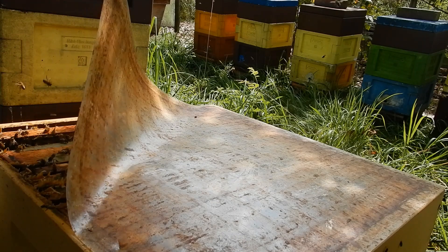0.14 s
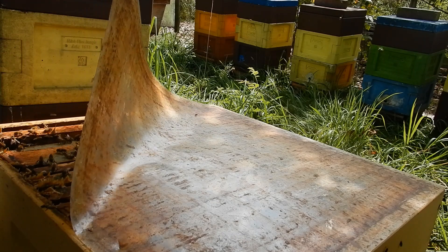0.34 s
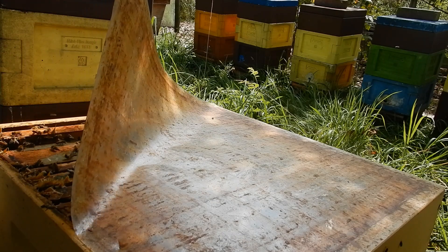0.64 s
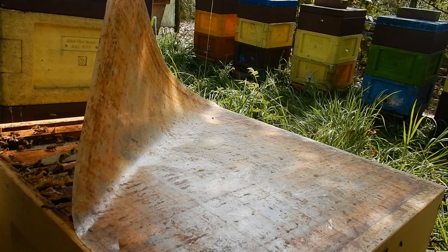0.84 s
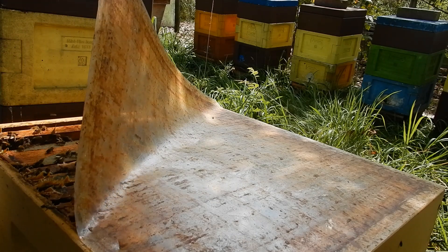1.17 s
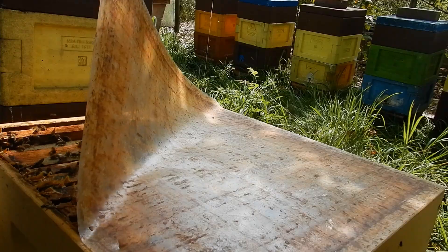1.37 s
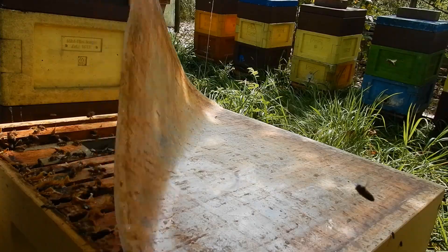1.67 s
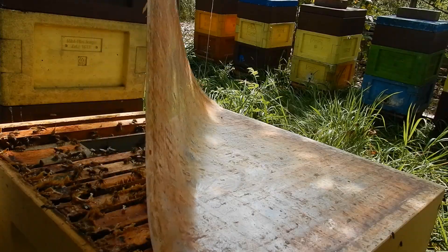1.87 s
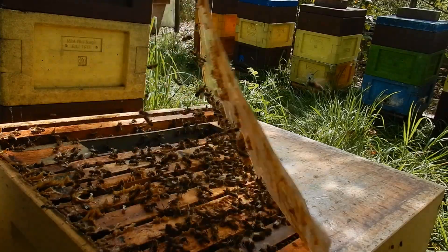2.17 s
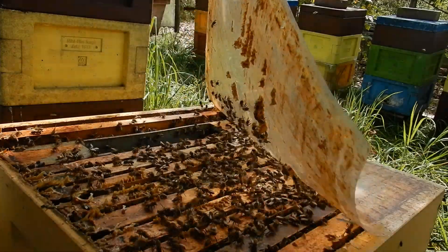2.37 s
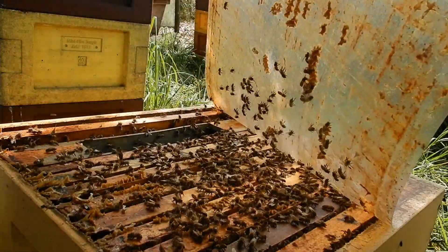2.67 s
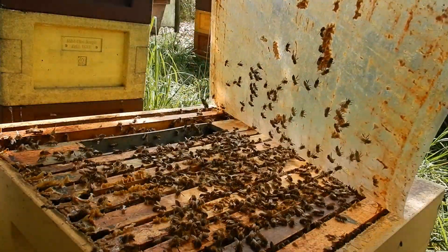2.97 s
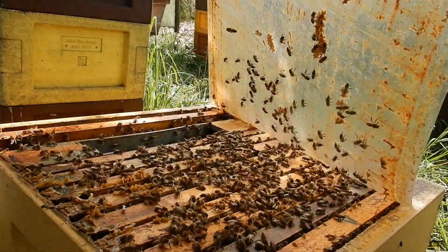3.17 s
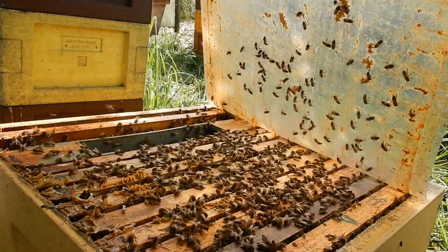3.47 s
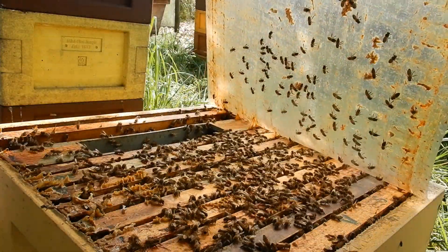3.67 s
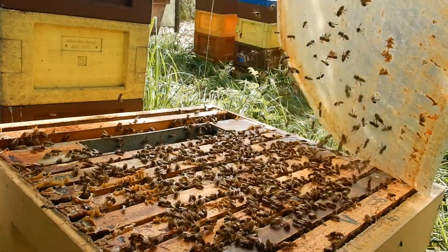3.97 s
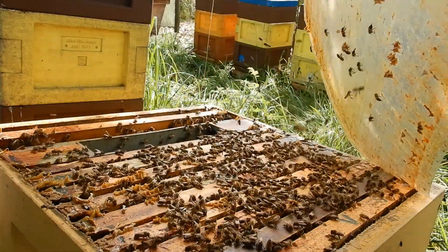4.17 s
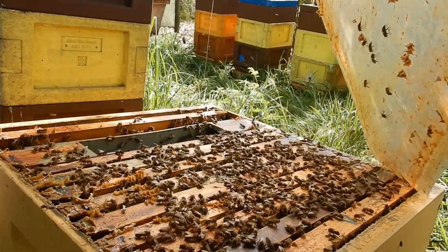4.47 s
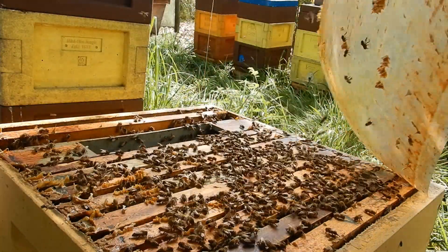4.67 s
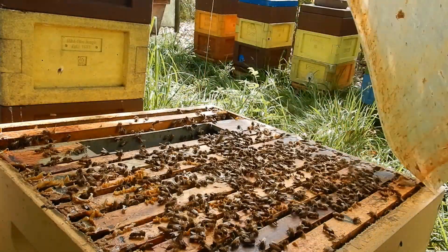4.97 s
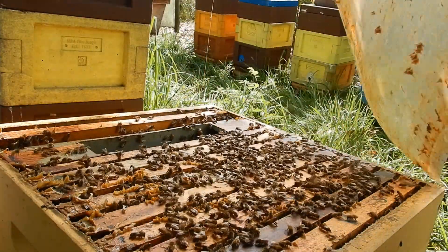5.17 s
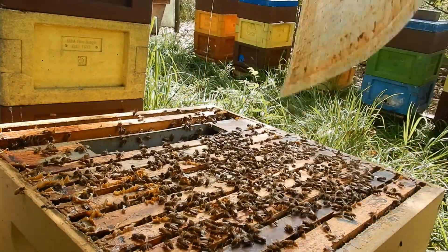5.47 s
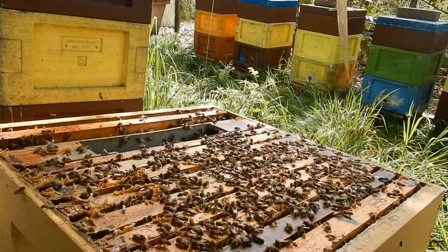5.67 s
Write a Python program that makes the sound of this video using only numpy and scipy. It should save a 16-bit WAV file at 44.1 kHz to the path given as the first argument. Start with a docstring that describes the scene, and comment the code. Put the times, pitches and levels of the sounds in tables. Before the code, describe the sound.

Outdoors, very close stereo microphones beside an open beehive. A stiff plastic cover stuck with propolis pops loose: a few isolated snaps first, a pause with soft bee hum, then crackling bursts with hollow hive thumps and floppy bends. The densest crackle comes around four seconds. Afterwards the freed sheet wobbles, ticks twice and scuffs the rim, leaving a faint hum.

```python
"""Snaps lead: a stiff plastic cover sheet is peeled off the frames of an open beehive, outdoors and close by.
Spots of sticky propolis let go in runs; each pops, cracks, and sets the sheet and the hive box ringing.
Finer threads tear in between, slack folds flop over, hard tugs jolt the hive with a thud and a boom.
The sheet wobbles as it is folded back, and again when it swings free and scuffs the rim.
Underneath, bees hum in wavering harmonics and rustle as coloured noise with a faint hiss; their level rises and dips."""
import sys
import numpy as np
from scipy import signal
from scipy.fft import rfft, irfft
from scipy.io import wavfile

SR = 44100
rng = np.random.default_rng(int(sys.argv[2]) if len(sys.argv) > 2 else 0)


def wrap_up_sound(samples):
    """Save the sound to the file named by the first command line argument, as 16-bit audio."""
    columns = np.atleast_2d(samples).T
    # keep every value between -1 and 1, then stretch to whole-number steps
    tamed = np.clip(columns, -1, 1)
    steps = np.round(tamed * 32767).astype(np.int16)
    wavfile.write(sys.argv[1], SR, steps)


N = 257266
TIME = np.arange(N) / SR

# Colour of a cracking bond. Each row: frequency in Hz, level in dB per Hz.
CRACK_COLOUR = [(900, -24), (2200, -12), (2900, -3.5), (3800, -6.5), (4900, 1), (6200, -10), (8000, -22),
                (12000, -33.5), (16000, -44.5)]
# Colour of the ringing sheet. Each row: frequency in Hz, level in dB per Hz.
SHEET_COLOUR = [(150, -23), (550, -8), (850, -3.5), (1200, -1), (1700, -1.5), (2600, -6.5), (3500, -10.5),
                (6000, -31), (12000, -58.5)]
# Colour of a push on the hive. Each row: frequency in Hz, level in dB per Hz.
THUD_COLOUR = [(20, -4.5), (60, 2), (130, 2.5), (400, 0), (750, -1.5), (1500, -24.5), (3000, -51.5)]
# Colour of the bending sheet. Each row: frequency in Hz, level in dB per Hz.
FLEX_COLOUR = [(40, -32), (120, -11.5), (210, 0.5), (380, 0), (750, -4.5), (1300, -13), (1900, -27.5),
               (3500, -50.5), (8000, -59)]
# The peeling edge as it travels across the hive. Each row: time in seconds, left minus right treble in dB,
# length of a pop in cycles, tuning of the box modes as a factor (high for a short taut span, low for a slack one).
PEEL_EDGE = [(.36, 3, 0.67, .8), (.46, 4, 0.96, 0.77), (.59, 3, 1.3, .88), (.635, 2, 0.54, 0.92),
             (1.75, 2, 0.53, 1.11), (2.2, 0, 0.54, 1.1), (3.35, -1, 0.76, 1.067), (3.73, -1, 0.61, 1.5),
             (3.85, -2, 0.3, 1.47), (4.18, 0, 0.48, 1.5), (4.55, -4, 1.7, 1.6)]
# Level of the background, which rises and dips. Each row: time in seconds, rustle in dB, hum in dB.
BACKGROUND_LEVEL = [(0, -57, -54), (.22, -62, -71), (.55, -55.5, -59), (.8, -63, -66), (1.6, -52.5, -52.5),
                    (2.1, -60.5, -63.5), (2.9, -51.5, -60), (3.05, -55, -65), (3.3, -54.5, -51.5),
                    (3.7, -60.5, -70), (4.14, -66.5, -63.5), (4.28, -72.5, -73.5), (4.85, -71, -75),
                    (5.2, -75.5, -71), (5.6, -70, -64), (5.82, -62.5, -69.5)]


def peeling(thread_db=-26, thread_s=0.003, sizzle_db=-7, push_db=-32):
    """Every snap is a crack and a pop; their joint energy pushes the hive and rings sheet and box."""
    # The bonds that break. Each row: time in seconds, pop level in dB before its colour, pop pitch in Hz,
    # crack level in dB, crack pitch in Hz, crack decay in seconds; levels as if all the energy fell in 1 ms.
    snaps = [(0.0523, -34.5, 1720, -49, 4600, 0.0017), (0.0751, -14.5, 1510, -17.5, 5600, 0.00056),
             (0.0776, -8.5, 1232, -18, 4750.0, 0.00053), (0.3637, -26.5, 1250, -34.5, 5560, 0.00058),
             (0.3861, -24.0, 2010, -37.5, 5350, 0.0005), (0.3985, -36, 1890, -55, 4900.0, 0.0016),
             (0.4166, -34.5, 1900, -58.0, 5050.0, 0.002), (0.4441, -31.0, 1520.0, -41, 5250.0, 0.0014),
             (0.4534, -11, 1180, -36.5, 4960, 0.001), (0.4738, -9.5, 1430, -28.5, 5530, 0.00047),
             (0.477, -11.5, 2170, -35.5, 4460, 0.0015), (0.5884, -29, 2310, -50.0, 4450.0, 0.0022),
             (0.6372, -2, 1405, -23.5, 5200.0, 0.00069), (1.057, -18.5, 1790, -28, 5000.0, 0.00025),
             (1.402, -40.5, 2880, -31, 4940, 0.00027), (1.7303, -15.5, 1350, -10.5, 4860, 0.00028),
             (1.743, -21.5, 1180.0, -33, 4800.0, 0.0008), (1.7481, -27, 1420.0, -28.0, 4900, 0.00045),
             (1.7638, -20, 1280, -23.5, 4850, 0.00055), (1.779, -22.5, 1390, -33, 4800, 0.0005),
             (1.7947, -25.0, 1560, -19, 4530, 0.0011), (1.8046, -21, 880.0, -37.5, 4570, 0.0004),
             (1.8136, -28.0, 1280.0, -38, 4750.0, 0.002), (1.8382, -30, 1550, -15, 5020, 0.0011),
             (1.8416, -16, 1330, -16.5, 4500, 0.00068), (1.905, -51, 1820, -28, 4850.0, 0.0015),
             (2.0811, -70, 3430.0, -37, 5100, 0.0013), (2.1525, -13, 1460, -13, 5060, 0.00017),
             (2.1746, -21, 1550, -20.5, 4740, 0.00096), (2.1845, -30.5, 1990.0, -23.5, 4900.0, 0.00014),
             (2.198, -41.5, 2000.0, -30.5, 5040, 0.0005), (2.2395, -21.5, 3140, -11.0, 5240, 0.00089),
             (2.348, -22, 1700, -17.5, 4600.0, 0.00035), (2.3753, -20.5, 2580, -25, 4500.0, 0.0021),
             (2.4167, -29.5, 1490, -31.5, 4400, 0.0017), (2.4473, -26.5, 1410.0, -26, 4880, 0.00046),
             (2.4838, -23, 1270, -42, 5100, 0.0013), (2.5045, -20, 1300, -36.5, 5040, 0.00082),
             (2.567, -45, 1410, -44.5, 4950, 0.00064), (2.9713, -20.5, 2240, -16, 4730, 0.00034),
             (3.0055, -22, 1950, -19.5, 4500, 0.00016), (3.1076, -41, 1990.0, -35.5, 4800, 0.00027),
             (3.1214, -17.5, 1360, -23, 4700, 0.00058), (3.13, -23.5, 1450.0, -30.5, 4600.0, 0.0013),
             (3.2038, -16, 1600, -14.5, 4520, 0.0014), (3.3338, -15, 1590, -21.5, 4330, 0.00046),
             (3.3633, -32, 1180.0, -39, 5150, 0.0013), (3.4474, -41.5, 2630, -31, 5000, 0.00059),
             (3.4867, -39, 1720.0, -21.0, 4760, 0.00023), (3.5252, -36, 2430.0, -22, 4880, 0.00027),
             (3.539, -15.5, 1750, -20.5, 4600, 0.0014), (3.5841, -14.5, 1810, -21.5, 4300.0, 0.00086),
             (3.587, -7.5, 2450, -15.5, 5100, 0.00044), (3.6016, -12, 2480.0, -16, 4650, 0.0011),
             (3.6098, -21.0, 2520.0, -29, 4460, 0.001), (3.7307, -12.0, 2840, -27.5, 5600.0, 0.0004),
             (3.8271, -41, 1940.0, -37.5, 4900.0, 0.00057), (3.8532, -13.5, 1850.0, -26.5, 4500.0, 0.0004),
             (3.861, -29, 2110.0, -25.5, 5100, 0.0007), (3.88, -24.5, 2750.0, -32.5, 4330, 0.00055),
             (3.8938, -13, 1590, -18, 4530, 0.0008), (3.9223, -15.5, 2590.0, -19.5, 4720, 0.00028),
             (3.933, -16.5, 2740, -14.5, 4700, 0.00028), (3.949, -12.5, 2350, -23.5, 4600.0, 0.0005),
             (3.9569, -13, 1820, -16.0, 4860, 0.00018), (3.963, -33.5, 2430.0, -30.5, 4350.0, 0.0022),
             (3.9714, -15.5, 2100, -21.0, 4400, 0.00083), (3.9738, -21, 1880, -23, 4400, 0.0008),
             (3.9872, -18, 2000, -14, 4600, 0.00021), (3.9978, -16, 2530.0, -19.5, 4300, 0.0007),
             (4.004, -32, 1930.0, -28, 4590, 0.00061), (4.0118, -26, 2110.0, -32, 4430, 0.00017),
             (4.022, -20, 2280, -26, 4350, 0.00073), (4.0341, -20, 1600.0, -16.5, 4750.0, 0.0004),
             (4.0452, -21.5, 1620, -20, 4700.0, 0.0004), (4.057, -32, 2130, -24, 4600, 0.0003),
             (4.0603, -32, 1880, -30, 4600, 0.00034), (4.0912, -39, 2180, -32.5, 4650.0, 0.00035),
             (4.159, -53, 2125, -44, 4800.0, 0.00036), (4.1809, -44, 2443, -27, 4580, 0.0003),
             (4.5745, -13, 4580, -18.5, 4860, 0.00044), (4.7424, -31.5, 1974, -34.5, 4870, 0.0014),
             (4.7509, -31, 1610, -34.5, 4300, 0.00093), (4.892, -63, 2730, -42, 5440, 0.0006),
             (4.9627, -33, 1620, -27.5, 4850.0, 0.00025), (5.0432, -14, 4710, -18, 4840, 0.00028),
             (5.496, -30.5, 1710.0, -42.5, 4460, 0.0017)]
    # Colour of the pops. Each row: frequency in Hz, gain in dB.
    pop_colour = [(300, -30), (760, -24.5), (1020, 0), (5000, -2.5), (7000, -11.5), (14000, -30.5)]
    # How much of a snap passes on: most while the edge crosses the loose frames, little on the rim.
    # Each row: time in seconds, to the sheet in dB, to the box in dB.
    coupling = [(.08, -6.5, -16.5), (.45, -8.5, -24), (.64, -18.5, -30), (1.1, -14, -18.5),
                (1.75, -5.5, -9), (2.5, -1.5, -9), (3, -2, -28.5), (3.2, 1.5, -8.5), (3.52, -1, -12),
                (3.55, -13.5, -30), (3.75, -14, -49.5), (4, -9, -22), (4.57, -19, -45.5), (5, -10, -20.5)]
    # The sheet recoils with a short dull knock at each snap, strongest near 3.5 s, weaker before and after.
    # Each row: time in seconds, level relative to the snap in dB.
    recoil = [(1.1, -33), (2.9, -15), (3.55, -10.5), (3.7, -30), (4.05, -21)]

    cracks, pops, rings, thuds, booms, threads, knocks = np.zeros((7, 2, N))
    recoil_db = curve(recoil)[0]
    _, cycles, tuning = curve(PEEL_EDGE)
    to_sheet_db, to_box_db = curve(coupling)
    push = blow(np.ones((2, 1)))
    for s, pop_db, hz, crack_db, crack_hz, crack_s in snaps:
        now = round(s * SR)
        snap_db = 20 * np.log10(np.hypot(amp(pop_db), amp(crack_db)))
        ring_db = snap_db + to_sheet_db[now]

        fracture = struck(size=1024, decay_s=crack_s, late_db=-26, late_s=0.0036, rise_s=0.00033, side_db=-10)
        add(cracks, s - .0003, amp(crack_db) * snap_colour(fracture, crack_hz))
        add(pops, s - .0003, amp(pop_db) * pop(hz, cycles[now]))

        ring = struck(size=4096, decay_s=0.0026, late_db=-15.5, late_s=0.014, rise_s=0.00094, side_db=-22)
        add(rings, s + .0002, amp(ring_db) * blow(ring))
        # only a sharp crack excites the sheet's highest modes
        sizzle = struck(size=4096, decay_s=0.001, late_db=-18, late_s=0.012, rise_s=0.0012, side_db=-7.5)
        excited_db = min(ring_db, crack_db) + sizzle_db
        add(cracks, s + .0005, amp(excited_db) * snap_colour(sizzle, crack_hz))

        add(thuds, s, amp(snap_db + push_db) * push)
        add(knocks, s, amp(snap_db + recoil_db[now]) * push)
        add(booms, s + .0005, amp(snap_db + to_box_db[now]) * boom(tuning[now]))

        # two fine threads of propolis part just after the main bond
        for when, strength in rng.standard_normal((2, 2)):
            tick = struck(size=128, decay_s=.0003, late_db=-23, late_s=.001, rise_s=.0001, side_db=-7)
            tick_db = crack_db + thread_db + 3 * strength
            add(threads, s + thread_s * abs(when), amp(tick_db) * blow(tick))
    sheet = travel(tinted(rings, SHEET_COLOUR)) + tinted(knocks, FLEX_COLOUR)
    fine = tinted(threads + creak(), CRACK_COLOUR)
    hive = tinted(thuds, THUD_COLOUR) + booms
    return place(cracks + fine + colour(pops, pop_colour) + sheet + hive)


def pop(hz, cycles, glide=0.03, scatter_db=-12, scatter_s=0.0023, size=768):
    """A released patch of sheet flips: a few swings that glide in pitch, then scatter from the frames."""
    t = np.arange(size) / SR
    u = hz * t - 2 * cycles  # cycles from the height of the pop
    bell = np.exp(-(u / cycles) ** 2 / 2)
    swing = bell * np.sin(2 * np.pi * (u + glide * u ** 2 / cycles + rng.random()))
    swing *= 1 - np.exp(-(hz * t / .5) ** 2)  # starts from rest
    paths = pair(size, side_db=-19.5) * np.exp(-t / scatter_s) * (t > .001)
    scattered = irfft(rfft(paths) * rfft(swing))
    return blow(blow(swing) + amp(scatter_db) * blow(scattered))


def struck(size, decay_s, late_db, late_s, rise_s, side_db):
    """A burst of crowded vibration: a quick fall, then a weaker, longer tail."""
    t = np.arange(size) / SR
    fall = np.exp(-t / decay_s) + amp(late_db) * np.exp(-t / late_s)
    return pair(size, side_db) * (1 - np.exp(-t / rise_s)) * fall


def snap_colour(x, hz, size=1024):
    """Gives a burst the colour of a crack whose main resonance lies at hz."""
    top_hz = max(CRACK_COLOUR, key=lambda point: point[1])[0]
    shifted = [(f * hz / top_hz, db) for f, db in CRACK_COLOUR]
    return blow(colour(x, shifted, size=size))


def travel(x, lag_s=0.003532, fast_hz=3000):
    """Bending waves cross the sheet: the low ones arrive late (lag_s sets the travel time at 1 kHz)."""
    size = 2 * x.shape[1]
    hz = np.fft.rfftfreq(size, 1 / SR)
    # delay relative to the waves at fast_hz and above
    slowness = 1 / np.sqrt(np.clip(hz, 100, fast_hz)) - 1 / np.sqrt(fast_hz)
    late_s = lag_s * np.sqrt(1000) * slowness
    phase = 2 * np.pi * np.cumsum(late_s) * SR / size  # delay summed over frequency
    return irfft(rfft(x, size) * np.exp(-1j * phase))[:, :x.shape[1]]


def boom(tuning, spread=.05, rise_s=0.0046, t60_s=0.16, size=8192):
    """The low modes of sheet and box, a little retuned and differently weighted at each blow."""
    # Modes of the sheet over the box. Each row: frequency in Hz before tuning, mean level in dB.
    box_modes = [(108, -15.5), (140, -4.5), (162, -1), (195, -8), (238, -4.5), (290, 1), (335, -2.5),
                 (400, -5), (465, -9), (540, -8.5), (640, -16), (730, -9), (820, -12.5), (950, -13),
                 (1150, -12)]
    hz, db = np.transpose(box_modes)[:, :, None]
    detune, weight, phase = rng.standard_normal((3, len(box_modes), 1))
    t = np.arange(size) / SR
    fading = amp(db + 1.8 * weight - 60 * t / t60_s)
    modes = fading * np.sin(2 * np.pi * (hz * tuning * (1 + spread * detune) * t + phase))
    return blow(modes.sum(0) * (1 - np.exp(-t / rise_s)))[None]


def creak(slips_hz=130, unevenness=0.1):
    """The tightening sheet sticks and slips: an almost regular train of tiny ticks."""
    # Faint creaks as the sheet tightens. Each row: time in seconds, level in dB.
    creak_level = [(.25, -68), (.29, -58.5), (.42, -59), (.44, -74.5)]
    turns = np.cumsum(slips_hz * (1 + unevenness * drift(35))) / SR
    slips = np.diff(np.floor(turns), prepend=0)
    return level(creak_level) * slips * blow(np.ones(1))


def tearing(threads_per_s=700, spread_db=5, body_db=-3):
    """Threads tear in a crowd of tiny breaks of very unequal size, each a tick that stirs the sheet."""
    # Fast stretches of the peel, where fine threads tear between the snaps.
    # Each row: time of the height in seconds, level in dB, time to build in seconds, time to settle in seconds.
    tears = [(1.78, -46, 0.028, 0.06), (2.4, -52.5, 0.12, 0.19), (3.41, -51, .03, .05),
             (3.98, -49, 0.14, 0.037)]
    breaks = (rng.random(N) < threads_per_s / SR) * amp(spread_db * rng.standard_normal(N))
    grain = sum(swell(*row) for row in tears) * evened(breaks * pair(N, side_db=-4))
    return place(tinted(grain, CRACK_COLOUR) + amp(body_db) * tinted(grain, SHEET_COLOUR))


def flops():
    """A wide fold turns over: a slow, soft pop that sinks in pitch."""
    # Slack folds that flop over after a release.
    # Each row: time of the height in seconds, level in dB, pitch in Hz, length in cycles.
    folds = [(.487, -22.5, 236, 2), (1.752, -23, 288, 1.5), (2.183, -34, 216, 1.1), (2.205, -26, 890, 1.2),
             (2.26, -29, 198, 1.4), (2.33, -26, 217, 1.3), (2.527, -29, 333, 2.4), (2.612, -28, 185, 0.58),
             (3.35, -19, 158.5, 1.9), (4.94, -27.5, 850, 2.45), (5.636, -32.5, 293, 1.3)]
    out = np.zeros((2, N))
    for s, db, hz, cycles in folds:
        fold = pop(hz, cycles, glide=-0.02, scatter_db=-15, scatter_s=.012, size=4096)
        add(out, s - 2 * cycles / hz, amp(db) * fold)
    return out


def jolts():
    """A hard tug shifts the frames: a dull thud and the boom of the box."""
    # Tugs on the sheet that jolt the hive.
    # Each row: time in seconds, thud in dB, box boom in dB, tuning of the box modes as a factor.
    tugs = [(0.4771, -46, -21.5, .8), (0.6379, -20, -28.5, 0.94), (1.7295, -27, -19.5, 1.14),
            (1.8, -40, -17.5, .98), (3.1205, -53, -23, 1.22), (3.3333, -49, -23.5, 0.89),
            (3.5854, -24, -46, 1.23), (4.575, -35, -51, 1.3), (5.0435, -35, -42, 1.8)]
    thuds, booms = np.zeros((2, 2, N))
    for s, thud_db, boom_db, tuning in tugs:
        add(thuds, s, amp(thud_db) * blow(np.ones((2, 1))))
        add(booms, s, amp(boom_db) * boom(tuning))
    return tinted(thuds, THUD_COLOUR) + booms


def wobble(flutter_db=3, buckles_per_s=450, smooth_db=0, tick_db=-38, ticks_per_s=45):
    """The loose sheet bends and shudders: small dull buckles in a fluttering rumble, and faint ticks."""
    # Bends of the sheet, first as it is folded back, then as it swings free.
    # Each row: time of the height in seconds, level in dB, time to build in seconds, time to settle in seconds.
    bends = [(1.755, -40.5, .015, .08), (1.825, -42, 0.04, 0.16), (2.185, -49, 0.012, 0.12),
             (2.255, -36, 0.011, 0.048), (2.5, -44, 0.025, 0.046), (4.828, -47.5, 0.12, 0.074),
             (4.94, -40, 0.022, 0.037), (5.06, -47, 0.065, 0.08), (5.285, -50, 0.023, 0.032),
             (5.366, -44, 0.034, 0.13), (5.5, -45.5, 0.0099, 0.047), (5.57, -42.5, 0.029, 0.037)]
    buckles = (rng.random(N) < buckles_per_s / SR) * rng.standard_normal(N)
    shudder = evened(evened(buckles) + amp(smooth_db) * pair(N, side_db=-20.5))
    ticks = evened((rng.random(N) < ticks_per_s / SR) * pair(N, side_db=-5))
    # the bends add in power
    motion = np.linalg.norm([swell(*row) for row in bends], axis=0) * amp(flutter_db * drift(34))
    return tinted(motion * shudder, FLEX_COLOUR) + tinted(motion * amp(tick_db) * ticks, CRACK_COLOUR)


def scuffs(catches_per_s=1800):
    """The loose edge scuffs over the rim: dense little catches of the rough edge on wood."""
    # Strokes of the edge. Each row: time of the height in seconds, level in dB, time to build in seconds,
    # time to settle in seconds, tuning of the colour as a factor (low for a slack edge).
    strokes = [(4.941, -39, 0.016, 0.016, 0.43), (5.326, -60, 0.01, .018, 1),
               (5.362, -46.5, 0.017, 0.014, 0.38), (5.41, -62, .006, .025, 1),
               (5.493, -43.5, 0.0047, 0.0045, 1), (5.506, -40.5, 0.0063, 0.011, 0.44)]
    # Colour of a scuff. Each row: frequency in Hz before tuning, level in dB per Hz.
    scuff_colour = [(300, -32), (1000, -7.5), (1650, 7), (2100, -6), (2800, -1.5), (4400, -10), (6500, -21),
                    (9000, -38), (14000, -63)]
    catches = evened((rng.random(N) < catches_per_s / SR) * pair(N, side_db=-19))
    out = np.zeros((2, N))
    for *stroke, tuning in strokes:
        tuned = [(f * tuning, db) for f, db in scuff_colour]
        out += tinted(swell(*stroke) * catches, tuned)
    return out


def bees(waver=0.038, flutter_db=4, tick_db=-11, ticks_per_s=350, size=512):
    """Wavering wingbeats over the rustle of many feet on the comb."""
    # Colour of the rustle. Each row: frequency in Hz, relative level in dB per Hz.
    rustle_colour = [(25, -25), (80, -8), (170, -4), (400, -7), (520, -17), (1000, -10.5), (1500, -11.5),
                     (2500, -17), (3900, -20.5), (4900, -15.5), (6500, -28), (9000, -44.5), (15000, -60)]
    # The wing stroke: relative levels of harmonics 1, 2, 3, .. in dB.
    wing_harmonics = [1.5, -2.5, -13.5, -19.5, -20]
    # Groups of bees. Each row: mean wingbeat in Hz, relative level in dB.
    wingbeats = [(150, -13), (178, -2), (199, -4), (222, -4.5), (265, -8), (335, -7)]
    rustle_db, hum_db = curve(BACKGROUND_LEVEL)
    cycle = np.linspace(0, 1, size)
    stroke = sum(amp(db) * np.sin(2 * np.pi * k * cycle) for k, db in enumerate(wing_harmonics, 1))
    hum = np.zeros(N)
    for hz, db in wingbeats:
        turns = np.cumsum(hz * (1 + waver * drift(3) + 0.015 * drift(40))) / SR
        hum += amp(db + flutter_db * drift(6.9)) * np.interp(turns % 1, cycle, stroke)
    feet = (rng.random(N) < ticks_per_s / SR) * rng.standard_normal(N)
    rustle = evened(colour(pair(N, side_db=-9) + amp(tick_db) * evened(feet), rustle_colour))
    return amp(rustle_db) * rustle + amp(hum_db) * evened(hum)


def air(top_db=-75, steepness=3.6, low_hz=7500, high_hz=13000):
    """A faint high hiss that rises steeply with the background level (steepness in dB per dB)."""
    rustle_db = curve(BACKGROUND_LEVEL)[0]
    band = signal.butter(2, [low_hz, high_hz], "band", fs=SR, output="sos")
    hiss = evened(signal.sosfilt(band, rng.standard_normal((2, N))))
    return amp(top_db + steepness * (rustle_db - rustle_db.max())) * hiss


def place(sound, shadow_hz=3500):
    """Two microphones hear the lows alike and the treble differently; the nearer gets more treble."""
    # The microphone pair. Each row: frequency in Hz, gain of what they do not share in dB,
    # phase lead of the left one in radians.
    ports = [(2200, -1.5, 0.12), (4460, 0, -0.02), (7000, 6, 0.67)]
    hz = np.fft.rfftfreq(N, 1 / SR)
    side_db, lead = (read(np.array(ports)[:, [0, k]], hz) for k in (1, 2))
    spectra = rfft(sound)
    mid, sides = spectra.mean(0), np.array([[.5], [-.5]])
    widened = mid + amp(side_db) * (spectra - mid)
    heard = irfft(widened * np.exp(1j * lead * sides), N)
    # above shadow_hz the recorder's body shades the far microphone
    highpass = signal.butter(2, shadow_hz, "high", fs=SR, output="sos")
    treble = signal.sosfiltfilt(highpass, heard)
    return heard + (amp(curve(PEEL_EDGE)[0] * sides) - 1) * treble


def swell(s, db, build_s, settle_s):
    """One movement of the sheet: it builds smoothly to its height, then dies away."""
    since = TIME - s
    return amp(db) * np.exp(-np.where(TIME < s, (since / build_s) ** 2, since / settle_s))


def colour(x, spectrum, size=4096):
    """Causal (minimum-phase) filter with the given spectrum: nothing sounds before the blow."""
    log_gain = np.log(amp(read(spectrum, abs(np.fft.fftfreq(size, 1 / SR)))))
    taps = np.fft.ifft(np.exp(np.conj(signal.hilbert(log_gain)))).real[:size // 2]
    return signal.fftconvolve(x, taps[None], axes=1)[:, :x.shape[1]]


def tinted(x, spectrum):
    """Colours white sound and keeps its power."""
    gain = amp(read(spectrum, np.fft.rfftfreq(4096, 1 / SR)))
    return colour(x, spectrum) / np.sqrt(np.mean(gain ** 2))


def pair(size, side_db):
    """White noise, mostly shared by the two microphones."""
    mid, side = rng.standard_normal((2, size))
    return mid + amp(side_db) * np.array([side, -side])


def drift(rate_hz, size=4096):
    """Slow random wandering of unit size."""
    hz = np.fft.rfftfreq(size, TIME[-1] / size)
    slow = evened(irfft(rfft(rng.standard_normal(size)) * np.exp(-(hz / rate_hz) ** 2)))
    return np.interp(TIME, np.linspace(0, TIME[-1], size), slow)


def amp(db):
    """Decibels to amplitude."""
    return 10 ** (np.asarray(db) / 20)


def evened(x):
    """Scales a sound to unit RMS."""
    return x / np.sqrt(np.mean(x ** 2) + 1e-20)


def blow(x):
    """Scales a short sound to the energy of one millisecond at full level."""
    return x / np.sqrt(np.mean(np.sum(x ** 2, -1)) * 1000 / SR + 1e-20)


def read(points, hz):
    """Reads a table on a log-frequency axis."""
    f, value = np.transpose(points)
    return np.interp(np.log(hz + 1), np.log(f + 1), value)


def curve(rows):
    """The columns of a time table, sample by sample."""
    s, *columns = np.transpose(rows)
    return [np.interp(TIME, s, c) for c in columns]


def level(rows):
    """Gain from a table of seconds and dB, silent outside it."""
    s, db = np.transpose(rows)
    return amp(np.interp(TIME, s, db, left=-np.inf, right=-np.inf))


def add(mix, s, sound):
    """Mixes a sound into a stereo layer at s seconds."""
    part = mix[:, max(round(s * SR), 0):][:, :sound.shape[1]]
    part += sound[:, :part.shape[1]]


def scene():
    """Snaps and tearing threads, flopping folds, the jolted hive, the swinging sheet and the bees."""
    sheet = peeling() + tearing() + flops() + jolts() + wobble() + scuffs()
    return sheet + bees() + air()


def record(dry, ceiling=1.0, cutoff_hz=16500):
    """The loudest peaks round off; then the recorder's band limit."""
    rounded = dry / (1 + (dry / ceiling) ** 4) ** (1 / 4)
    lowpass = signal.firwin(511, cutoff_hz, window=("kaiser", 9), fs=SR)
    return signal.oaconvolve(rounded, lowpass[None], "same")


dry = scene()
out = record(dry)
wrap_up_sound(out)
```